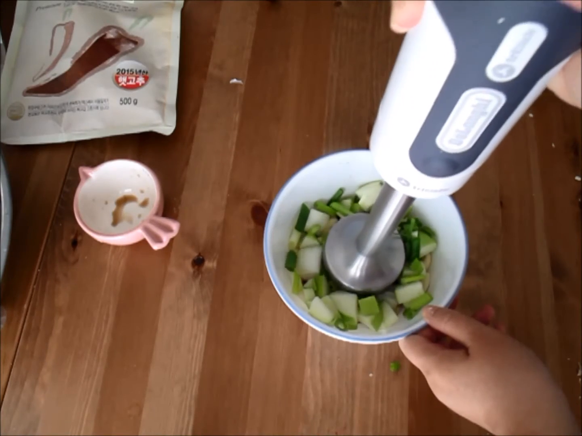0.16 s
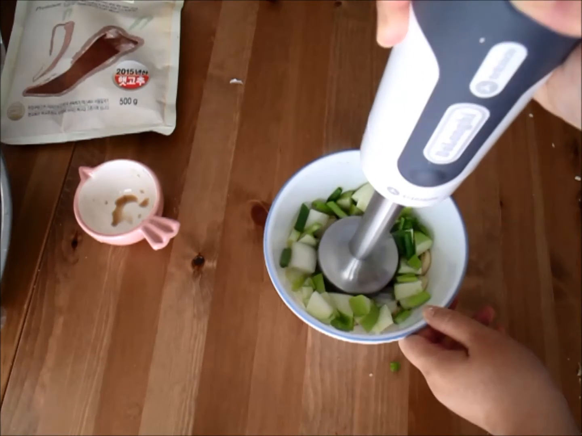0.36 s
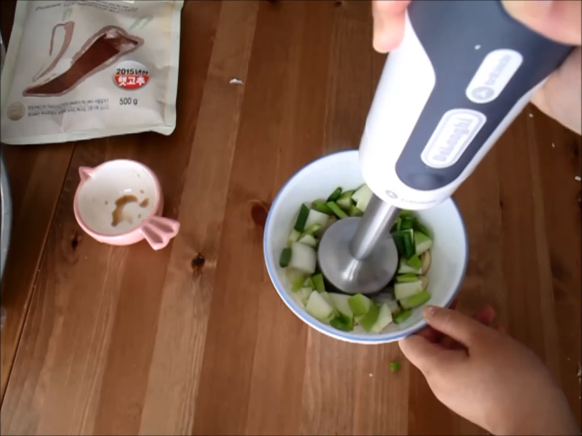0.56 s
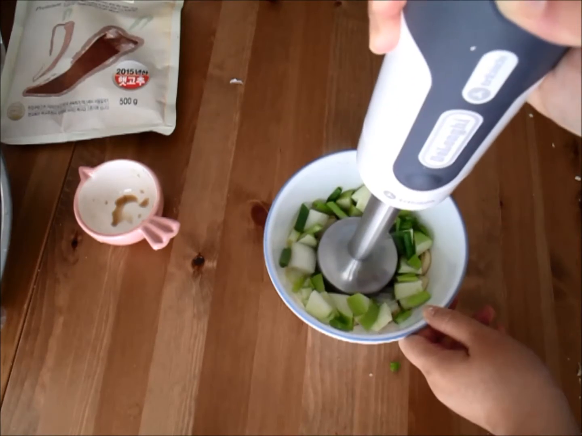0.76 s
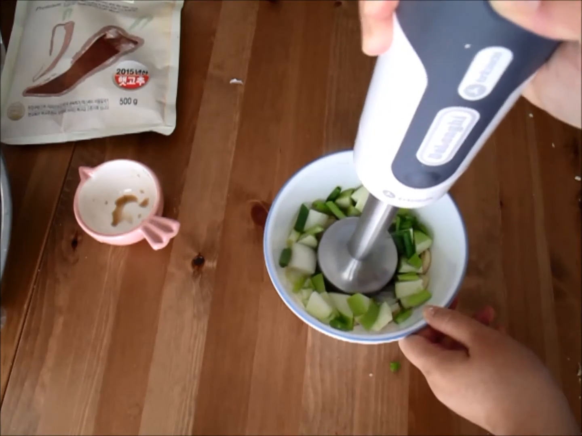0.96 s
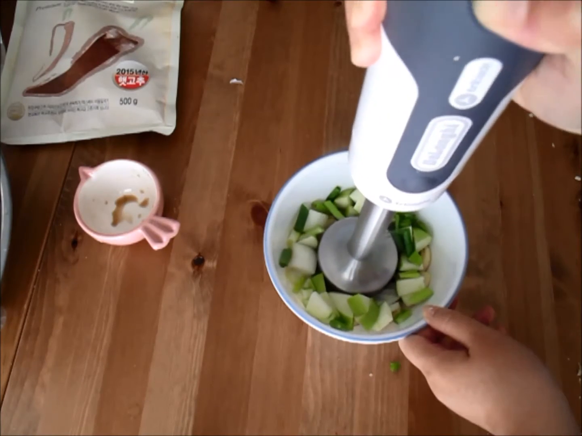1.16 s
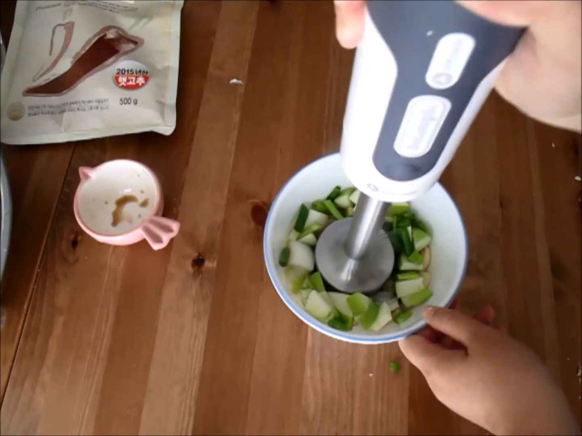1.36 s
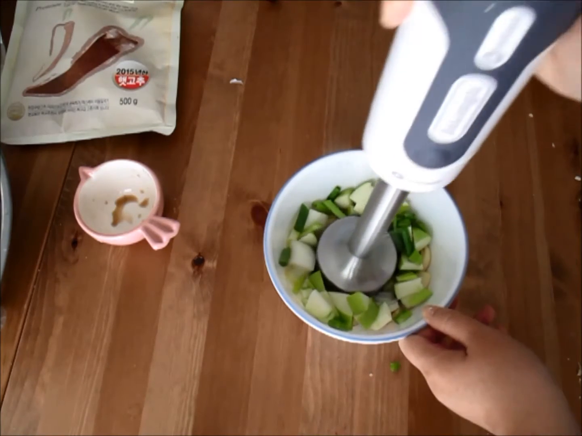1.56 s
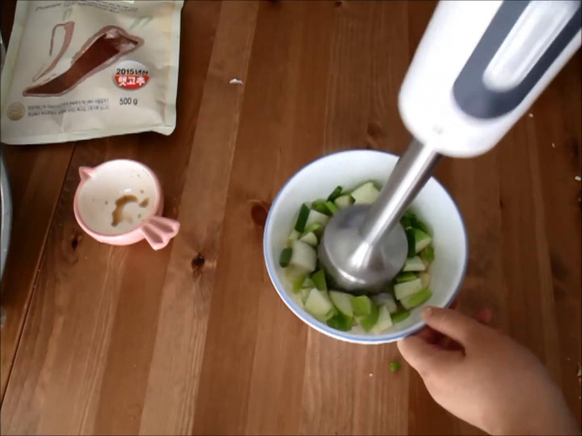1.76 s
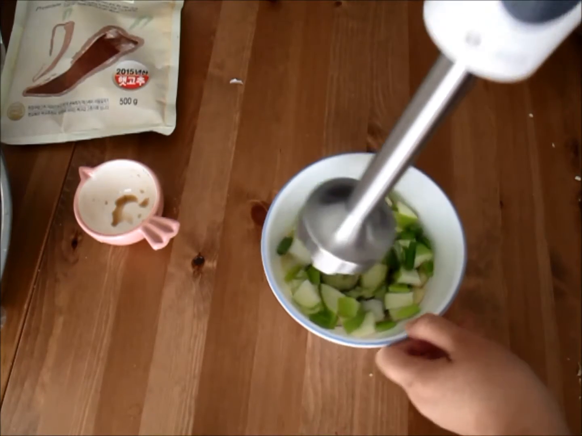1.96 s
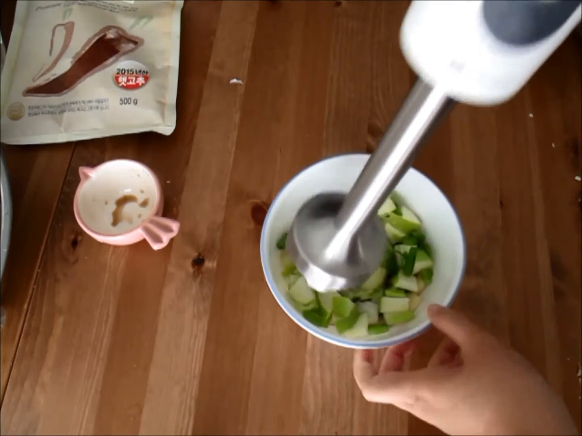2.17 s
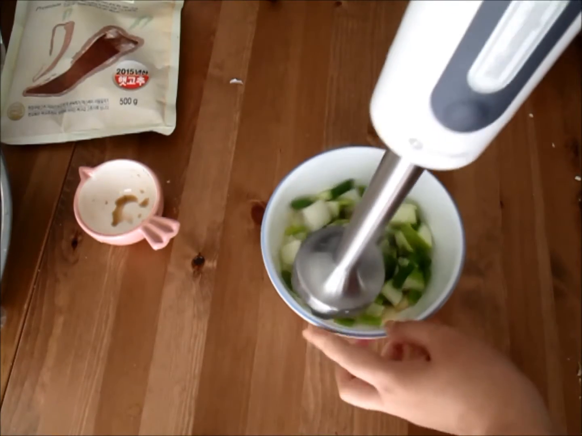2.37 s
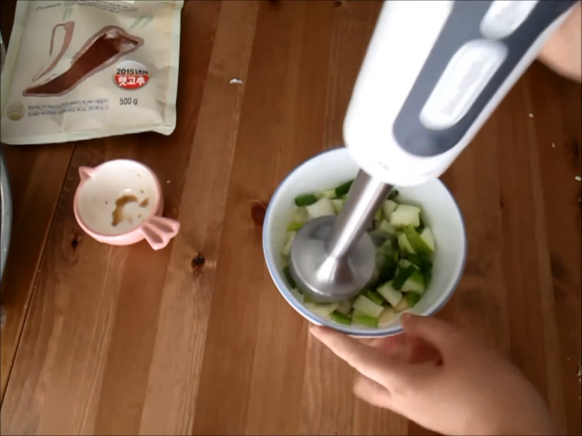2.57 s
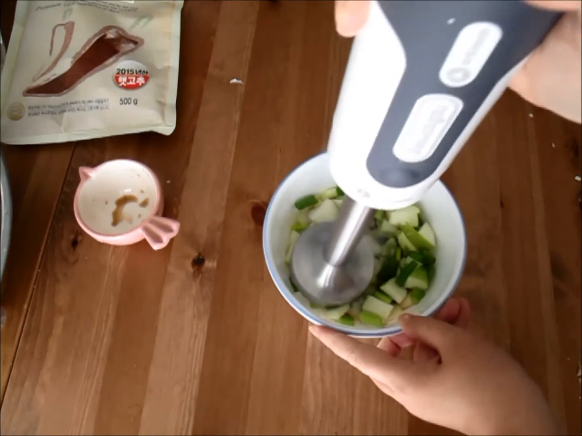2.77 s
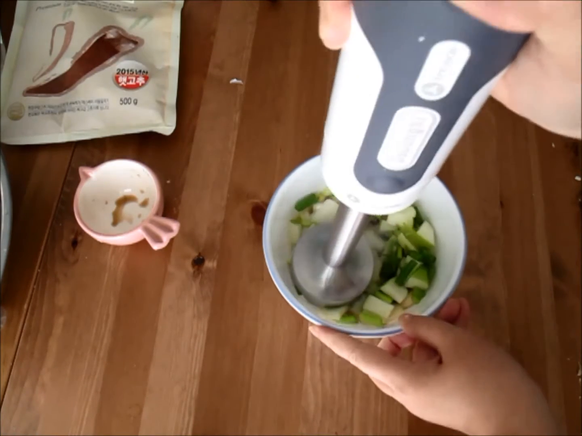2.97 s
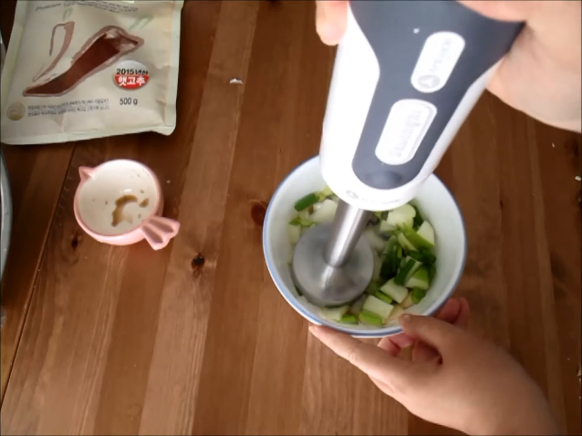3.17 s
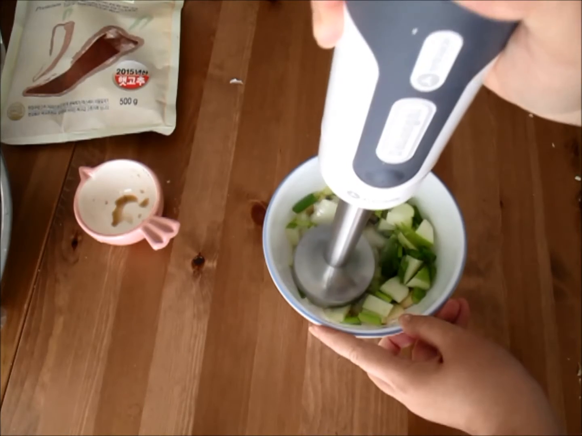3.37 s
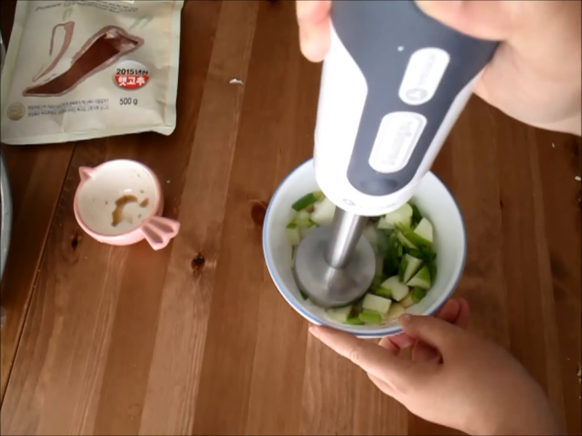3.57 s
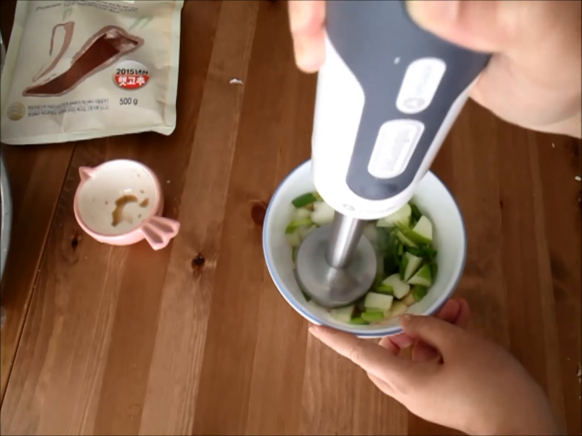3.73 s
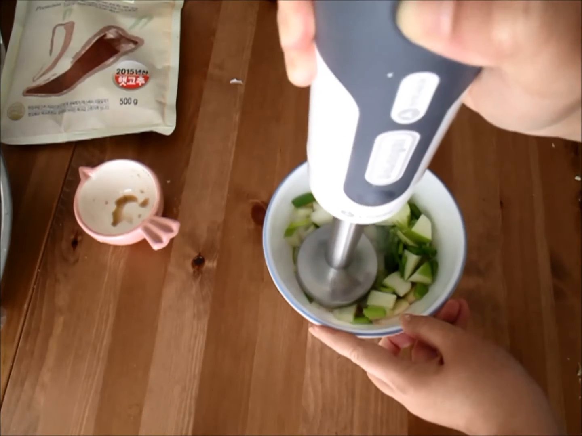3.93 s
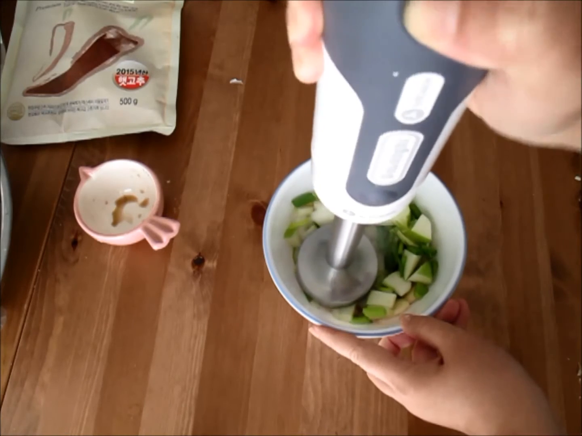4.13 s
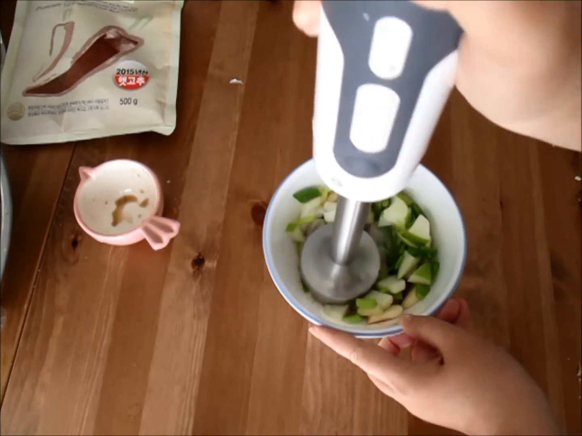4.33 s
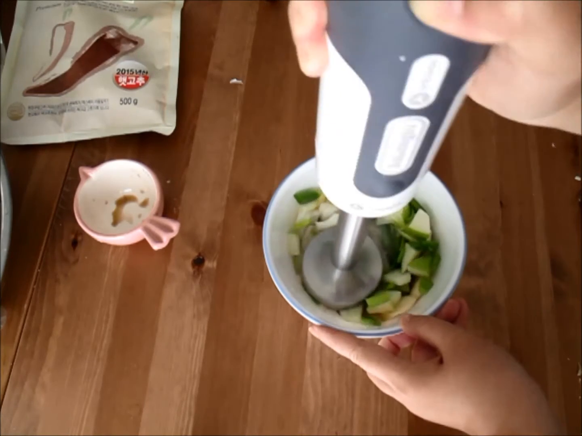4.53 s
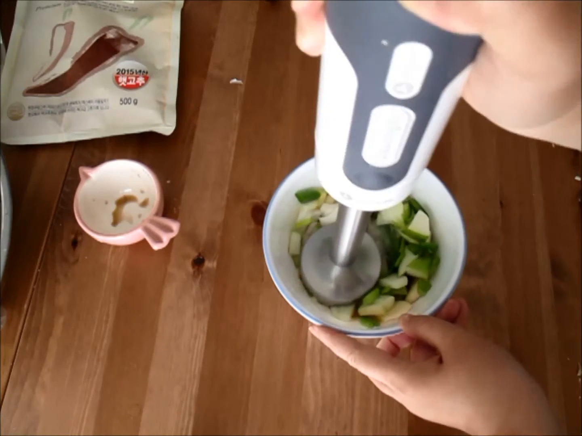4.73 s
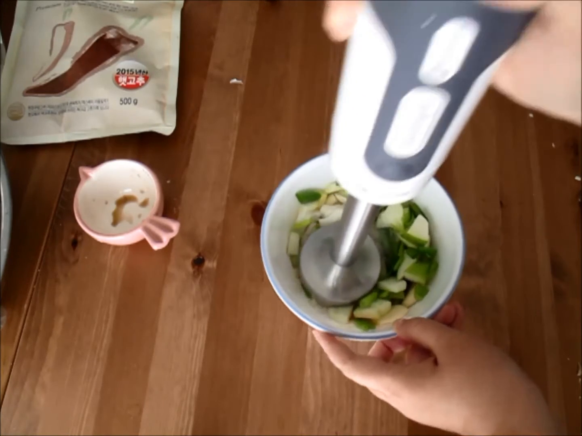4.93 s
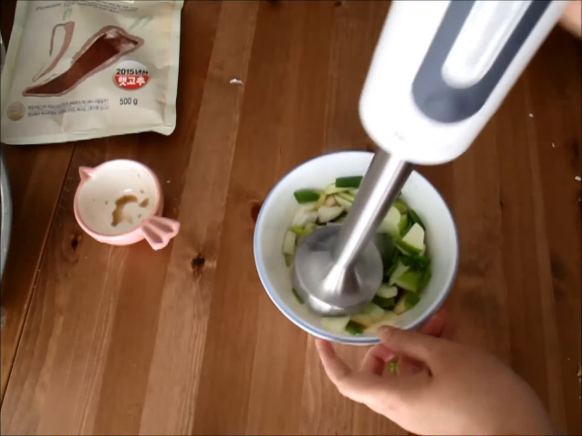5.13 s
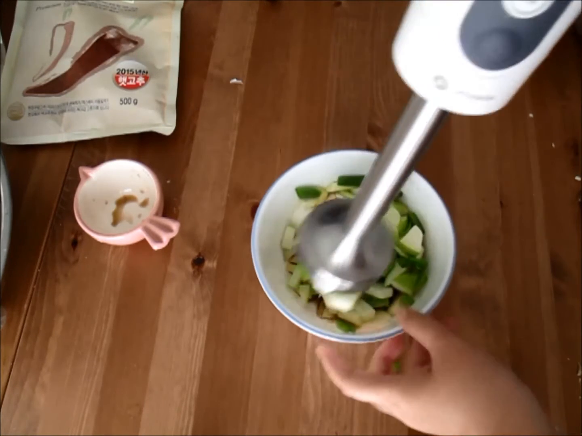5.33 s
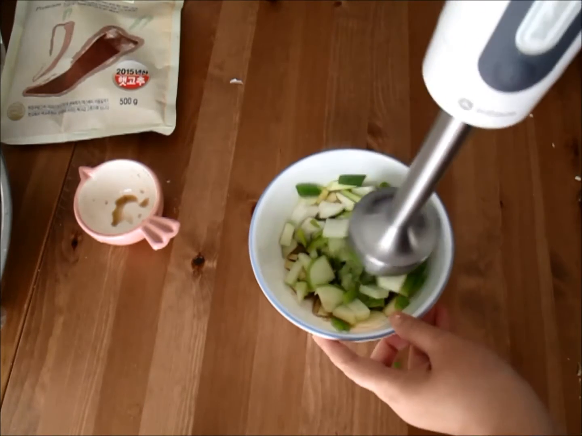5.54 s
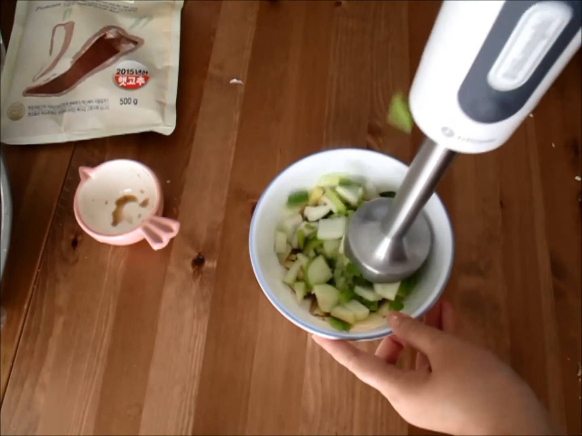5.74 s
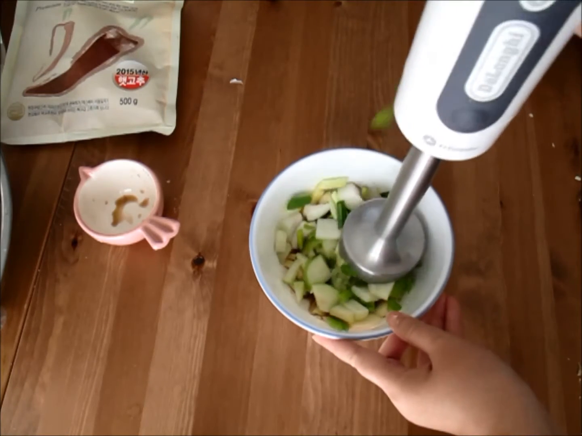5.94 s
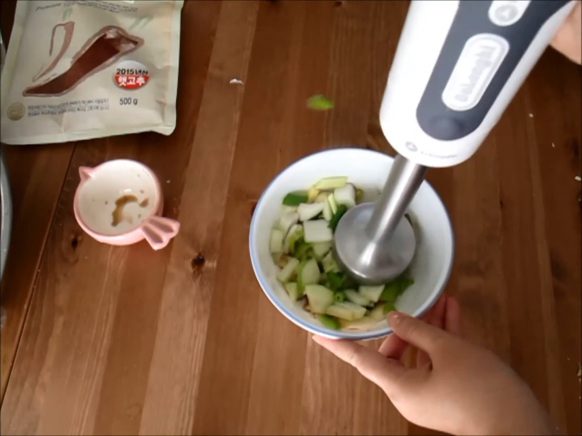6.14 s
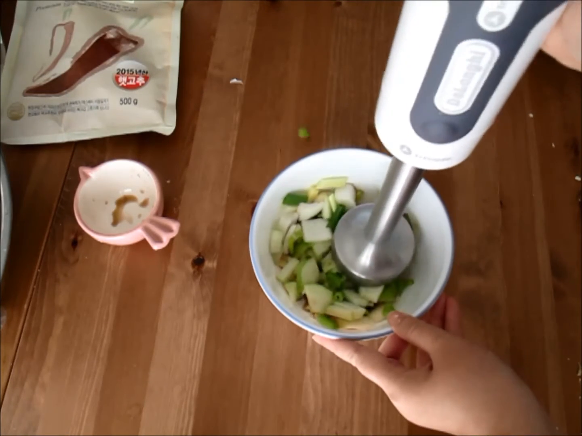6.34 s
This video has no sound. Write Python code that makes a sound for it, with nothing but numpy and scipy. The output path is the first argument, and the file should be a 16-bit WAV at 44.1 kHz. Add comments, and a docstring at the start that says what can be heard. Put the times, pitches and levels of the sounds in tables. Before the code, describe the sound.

Harsh whining blender motor chops wet vegetables in bursts, winding down each time, with sharp knocks ringing the ceramic bowl.

```python
"""A stick blender chops spring onion in a china bowl on a wooden table, in a small kitchen with faint steady tones.
It is already running: the shaft rattles each turn, the blade hums in its steel bell, the commutator whines.
Let go, it coasts down with hard ticks; its bell knocks on the bowl, which rings, and the button is pressed again.
A second burst and ticking coast follow, then more knocks and a third burst, still running at the end.
Shaft angle drives the motor's tones and contacts; filtered noise makes hiss and thuds; resonators ring the steel and china."""
import sys
import numpy as np
from scipy import signal
from scipy.fft import rfft, irfft
from scipy.io import wavfile
from scipy.ndimage import uniform_filter1d

SR = 44100
rng = np.random.default_rng(int(sys.argv[2]) if len(sys.argv) > 2 else 0)


def int16_out(signal):
    """Quantize to a 16-bit WAV file."""
    q = np.round(np.clip(np.atleast_2d(signal).T, -1, 1) * 32767)
    wavfile.write(sys.argv[1], SR, q.astype(np.int16))


N = 282240
TIME = np.arange(N) / SR  # s


def from_db(db):
    """Decibels to gain."""
    return 10 ** (np.asarray(db) / 20)


def rms_one(x):
    """Scale to unit rms."""
    return x / np.sqrt(np.mean(x ** 2) + 1e-20)


def evened(x):
    """Level out the running rms to about one, leaving near-silence low."""
    running_power = np.abs(uniform_filter1d(x ** 2, size=2400))
    return x / np.sqrt(running_power + 1e-4 * np.mean(x ** 2))


def in_time(rows):
    """One curve over time for each column of a table."""
    s, *columns = np.transpose(sorted(map(tuple, rows)))
    return [np.interp(TIME, s, c) for c in columns]


def coloured(x, spectrum):
    """Causal (minimum-phase) filter with the given spectrum, built through the cepstrum."""
    size = 4096
    hz, db = np.transpose(spectrum)
    bin_hz = np.arange(size // 2 + 1) * SR / size
    bin_db = np.interp(np.log(bin_hz + 1), np.log(hz), db)
    cepstrum = irfft(np.log(from_db(bin_db)))[:size // 2]
    cepstrum[1:] *= 2
    response = irfft(np.exp(rfft(cepstrum, size)))
    return signal.oaconvolve(x, response)[:N]


def noise(spectrum):
    """Coloured noise, rms 1."""
    return rms_one(coloured(rng.standard_normal(N), spectrum))


def drift(rate):
    """Random wander, rms 1, with the given number of new values per second."""
    steps = rng.standard_normal(4000)
    return rms_one(np.interp(TIME * rate, np.arange(len(steps)), steps))


def dying_noise(t60):
    """The response of countless close modes, nearly even in frequency, with unit energy."""
    t = TIME[:SR // 2]
    modes = rfft(rng.standard_normal(len(t)) * from_db(-60 * t / t60))
    flat = irfft(modes / (np.abs(modes) + 1e-12), len(t))
    response = flat * from_db(-15 * t / t60)
    return response / np.linalg.norm(response)


def resonance(hz, centre_hz, width_hz):
    """Gain of a resonance, 1 on top."""
    return 1 / np.sqrt(1 + (2 * (hz - centre_hz) / width_hz) ** 2)


def moving_ring(x, centre_hz, width_hz, size=256):
    """A two-pole resonator whose centre and width may glide, updated once a block."""
    radius = np.exp(-np.pi * width_hz / SR) * np.ones(N)
    out, state = np.zeros(N), np.zeros(2)
    for i in range(0, N, size):
        r = radius[i]
        zeros = np.array([1, 0, -1]) * (1 - r * r) / 2
        poles = [1, -2 * r * np.cos(2 * np.pi * centre_hz[i] / SR), r * r]
        out[i:i + size], state = signal.lfilter(zeros, poles, x[i:i + size], zi=state)
    return out


def fixed_ring(x, centre_hz, width_hz):
    """A resonator that keeps its pitch."""
    return moving_ring(x, np.full(N, centre_hz), width_hz, size=N)


def ramp(at, length_s):
    """Rise from 0 to 1, centred on a moment."""
    return np.clip((TIME - at) / length_s + .5, 0, 1)


def spell(start, end):
    """Swell, hold and fade, each edge centred on its moment."""
    edge_s = .04
    return ramp(start, edge_s) * (1 - ramp(end, edge_s))


def spells(rows):
    """Summed gain over time for a table of (start, end, level)."""
    return sum(from_db(db) * spell(start, end) for start, end, db in rows)


# Room noise spectrum: (frequency [Hz], relative density [dB])
ROOM_SPECTRUM = [(15, -24), (25, -13), (90, -13), (134, -8), (206, -8), (301, -8), (439, -2), (545, -12),
                 (641, -3.5), (1190, -12.5), (4140, -21), (5570, -21), (6050, -14), (6560, -30),
                 (9570, -15.5), (16000, -53)]
# Faint steady tones: (frequency [Hz], rms level [dB])
STEADY_TONES = [(296.1, -68), (538.3, -60.5), (5879, -61)]


def background():
    """Room noise is shaped noise; the faint steady tones are plain sines."""
    room = from_db(-51.5) * noise(ROOM_SPECTRUM)
    tones = sum(np.sqrt(2) * from_db(db) * np.sin(2 * np.pi * hz * TIME) for hz, db in STEADY_TONES)
    return room + tones


def kitchen(x, t60, wet_db):
    """The near walls return a short diffuse tail, 6 ms late."""
    tail = np.concatenate([np.zeros(int(.006 * SR)), dying_noise(t60)])
    return x + from_db(wet_db) * signal.oaconvolve(x, tail)[:N]


# The bell strikes and the blade bites:
# (time [s], crack level [dB], table thud level [dB], bowl ring drive [dB])
KNOCKS = [(2.378, -22.5, -27.5, -41), (2.431, -37, -38, -51), (2.609, -30, -41.5, -56),
          (2.664, -39, -49, -66), (2.697, -42, -52, -70), (2.769, -38, -66, -78), (2.835, -23, -55, -70),
          (2.841, -9.5, -34, -43), (2.861, -11, -48, -55), (3.308, -11, -52, -53),
          (5.5945, -14.5, -18.5, -41), (5.621, -27, -32, -49), (5.648, -24, -31, -63),
          (5.671, -21, -30, -62), (5.676, -15, -25.5, -44.5), (5.686, -14.5, -23, -64),
          (5.987, -7.5, -33.5, -58.5), (6.000, -5, -50, -51), (6.112, -14, -56, -65)]


def blows(column, t60, rise_s):
    """Each knock rises fast and dies exponentially, at the level in one column of its table."""
    out = np.zeros(N)
    for s, *levels_db in KNOCKS:
        at = int(s * SR)
        t = TIME[:min(N - at, SR // 2)]
        out[at:at + len(t)] += from_db(levels_db[column] - 60 * t / t60) * (1 - np.exp(-t / rise_s))
    return out


# Knock spectra, crack and table thud: (frequency [Hz], relative density [dB])
CRACK_SPECTRUM = [(200, -23), (700, -34), (1300, 4), (2500, -0.5), (5000, -8), (8500, -0.5), (16000, -11)]
THUD_SPECTRUM = [(40, -25), (120, 6.5), (200, -3.5), (390, 8.5), (560, -4.5), (850, 2.5), (1400, -10),
                 (3000, -14.5)]
# The bell shuffles among the wet pieces: (start [s], end [s], level before its flutter [dB])
SHUFFLE = [(2.28, 2.58, -57), (2.59, 2.71, -48)]
# A low rumble while the hand shifts the bowl: (start [s], end [s], level [dB])
SHIFTING = [(2.3, 2.95, -61.5)]
# Spectrum of that rumble: (frequency [Hz], relative density [dB])
SHIFT_SPECTRUM = [(20, -16), (58, 5), (95, -14), (300, -45)]


def bowl():
    """Noise bursts crack and thump the table; wet pieces shuffle as fluttering noise; the bowl rumbles."""
    shuffle = spells(SHUFFLE) * from_db(3.8 * drift(190))
    crack = (blows(0, t60=0.028, rise_s=0.00052) + shuffle) * noise(CRACK_SPECTRUM)
    thud = blows(1, t60=0.087, rise_s=0.00037) * noise(THUD_SPECTRUM)
    return crack + thud + spells(SHIFTING) * noise(SHIFT_SPECTRUM)


# Ringing modes of the bowl: (frequency [Hz], level re the knock's ring drive [dB], decay by 60 dB [s])
BOWL_MODES = [(382, -3, .3), (1384, 8, .27), (2568, 3, .5), (3601, -8, .2), (4037, -5, .3), (5803, 4, .2),
              (7817, -2, .27)]


def china():
    """The knocks set the bowl's modes ringing, each a decaying sine."""
    s, _, _, ring_db = np.transpose(KNOCKS)
    out = np.zeros(N)
    for hz, db, t60 in BOWL_MODES:
        clicks = np.full(N, 1e-18)
        clicks[(s * SR).astype(int)] = from_db(ring_db + db + rng.normal(0, 1, len(s)))
        r, w = from_db(-60 / (t60 * SR)), 2 * np.pi * hz / SR
        out += signal.lfilter([0, np.sin(w)], [1, -2 * r * np.cos(w), r * r], clicks)
    return out


# The button is pressed and let go: (press [s], release [s], the rattling shaft settles [s],
# dry friction [turns per s per s], speed lost to the pieces [turns per s])
BURSTS = [(-1, 1.42, 1.705, 143, 72), (2.838, 4.8, 5.095, 186, 46), (5.984, 7, 7.3, 188, 45)]


def by_burst(tables):
    """Each burst's curves take over when the button is pressed."""
    curves = in_time(tables[0])
    for (press, *_), rows in zip(BURSTS, tables):
        curves = np.where(TIME >= press, in_time(rows), curves)
    return curves


# Powered shaft speed before spin-up and braking, one curve a burst: (time [s], speed [turns per s])
POWERED_SPEED = [
    [(0.0, 222.1), (0.292, 210.8), (0.418, 223.4), (0.502, 218.9), (1.012, 218.4), (1.114, 211.1),
     (1.166, 210.4), (1.23, 201.4), (1.284, 189.2), (1.388, 196.0), (1.42, 202.5)],
    [(2.98, 231.8), (3.076, 235.0), (3.284, 228.8), (3.324, 223.2), (3.516, 219.2), (3.598, 220.8),
     (3.886, 212.8), (4.014, 215.2), (4.16, 212.2), (4.338, 202.6), (4.494, 212.5), (4.642, 214.4),
     (4.8, 228.2)],
    [(6.15, 230.9), (6.254, 232.3), (6.4, 227.6)],
]
SPIN_UP_S, DRAG_S, SETTLE_S = .032, .115, 0.052  # start and braking time constants, settling time


def drive():
    """The shaft spins up, runs, then coasts against pieces and dry friction; gives speed and settling 0-1."""
    powered, = by_burst(POWERED_SPEED)
    speed, settled = np.zeros(N), np.zeros(N)
    for press, release, settle, friction, drag in BURSTS:
        running = np.maximum(TIME - press, 0)
        coasting = np.maximum(TIME - release, 0)
        lost = friction * coasting + drag * (1 - np.exp(-coasting / DRAG_S))
        spun_up = powered * (1 - np.exp(-running / SPIN_UP_S))
        speed = np.where(TIME >= press, spun_up - lost, speed)
        settled = np.where(TIME >= press, ramp(settle, SETTLE_S), settled)
    return np.maximum(speed, 0), settled


# Each layer: (gain while running [dB], level once the shaft has settled [dB],
# power of the speed by which it dies away [-])
LAYERS = {"hum": (0.3, -50, 1.0), "drone": (0.68, -49.5, 1.0), "bell": (0.7, -41.5, 0.77),
          "rattle": (-0.92, -37, 1.16), "brush": (0.87, -29.5, 1.25)}
FADE_BELOW_TURNS_PER_S = 67.4


def loudness(layer, running_db, speed, settled):
    """A layer drops when the shaft settles, then dies away with the speed."""
    gain_db, coasting_db, power = LAYERS[layer]
    fade = np.clip(speed / FADE_BELOW_TURNS_PER_S, 1e-6, 1) ** power
    running = (1 - settled) * from_db(running_db + gain_db)
    return running + settled * from_db(coasting_db) * fade


# A slower shaft runs rougher: (speed [turns per s], roughness before chewing [0-1])
SPEED_ROUGHNESS = [(70, 0.94), (135, 0.65), (200, 0.58), (220, .445), (235, 0.37)]
# The blade chews through pieces, or runs smoothly in a hollow:
# (start [s], end [s], added roughness [0-1], added rattle level [dB])
CHEWING = [(0, .33, 0.19, -1), (0.34, 1.04, -.05, -1.5), (1.06, 1.57, 0.11, 0), (1.57, 1.85, -.08, 0),
           (2.827, 2.916, .3, -0.5), (3.17, 3.22, 0.14, 2.5), (3.294, 3.337, .45, 4.5),
           (3.358, 3.85, 0.05, 0), (3.85, 4.3, 0.12, 0.5), (4.304, 4.423, 0.03, -0.5),
           (4.503, 4.61, 0.1, 1), (4.66, 4.8, 0.08, 1.5), (4.8, 5.0, -.07, 0.5), (5.0, 5.1, -.04, 0),
           (5.977, 6.117, 0.2, 1), (6.12, 6.372, 0.08, -0.5), (6.365, 6.45, 0.37, 1.5)]


def roughness(speed):
    """Roughness grows as the shaft slows and while the blade chews."""
    chewing = sum(added * spell(start, end) for start, end, added, _ in CHEWING)
    return np.clip(np.interp(speed, *np.transpose(SPEED_ROUGHNESS)) + chewing, .05, 1)


# Once-a-turn tone of the unbalanced blade, one curve a burst: (time [s], rms level at speed [dB])
UNBALANCE = [
    [(0.0, -49), (0.188, -55), (0.444, -45), (1.052, -59), (1.29, -42.5), (1.528, -48), (1.55, -48)],
    [(2.92, -49), (3.58, -52), (3.68, -70), (3.82, -50), (3.97, -46), (4.45, -46), (4.59, -50), (4.95, -47)],
    [(6.04, -60), (6.164, -49), (6.4, -61)],
]


def unbalance(angle, speed):
    """The unbalanced blade sounds a sine once a turn, absent when slow."""
    db, = by_burst(UNBALANCE)
    fast = np.clip((speed - 80) / 60, 0, 1)
    return np.sqrt(2) * from_db(db) * fast * np.sin(angle)


# Buzz of the motor's iron: (start [s], end [s], peak level [dB])
MAINS_BUZZ = [(3.55, 4.1, -55.5)]


def mains_buzz():
    """The motor's iron buzzes at twice the 60 Hz mains rate."""
    return spells(MAINS_BUZZ) * np.sin(2 * np.pi * 2 * 60 * TIME)


def blade(turns, speed, rough, low_hz, high_hz, centre_hz, width_hz, count):
    """The blade's harmonics, from the second, that fall within one resonance of the steel bell."""
    tone = 0
    for order in np.arange(2, count + 1):
        hz = order * speed
        passed = 1 / np.sqrt((1 + (low_hz / hz) ** 32) * (1 + (hz / high_hz) ** 32))
        gain = passed * resonance(hz, centre_hz, width_hz) * from_db(4.0 * drift(11))
        blur = 0.63 * rough * drift(70)
        tone = tone + gain * np.sin(2 * np.pi * (order * turns + rng.random()) + blur)
    cutting = np.clip((speed - 80) / 70, 0, 1)  # a slow blade only stirs
    return cutting * evened(tone)


# Blade's low harmonics, one curve a burst:
# (time [s], hum level before layer gain [dB], drone level before layer gain [dB])
BLADE_LEVELS = [
    [(0.0, -57, -48), (0.268, -45, -58), (0.356, -44, -35), (0.414, -53.5, -33.5), (0.762, -38.5, -30.5),
     (1.054, -42, -32.5), (1.092, -46, -39), (1.364, -34, -36), (1.444, -47, -50), (1.548, -35.5, -41),
     (1.69, -53, -48)],
    [(2.85, -44, -50), (2.9, -56, -44), (3.08, -42, -41), (3.17, -52, -26), (3.28, -39, -39),
     (3.4, -56, -36), (3.6, -39, -32.5), (4.0, -46, -39.5), (4.18, -40, -35.5), (4.23, -57, -36),
     (4.35, -40.5, -46), (4.68, -38, -34), (4.75, -32, -52), (4.86, -31.5, -36), (5.07, -52, -57)],
    [(6.02, -56, -52), (6.128, -48, -60), (6.196, -46, -54), (6.4, -53, -59)],
]
# Steel bell as the filling shifts, one curve a burst:
# (time [s], level before layer gain [dB], resonance [Hz])
BELL = [
    [(0.0, -33.5, 1110), (0.112, -38.5, 1300), (0.188, -31, 1320), (0.54, -29.5, 980), (0.676, -27.5, 990),
     (0.87, -29.5, 950), (1.152, -28.5, 1060), (1.204, -30, 1260), (1.426, -29.5, 1140), (1.69, -33, 1430)],
    [(2.85, -28.5, 1410), (2.92, -28.5, 910), (3.12, -27, 920), (3.28, -24, 1040), (3.45, -23.5, 960),
     (3.62, -23.5, 910), (3.73, -23, 855), (3.85, -29, 948), (3.99, -24, 862), (4.18, -26, 870),
     (4.24, -27.5, 1380), (4.48, -37.5, 1330), (4.6, -36, 970), (4.69, -32, 1440), (4.97, -35, 1460),
     (5.03, -27.5, 1540), (5.07, -32, 1510)],
    [(6.0, -31.5, 1260), (6.1, -29.5, 1150), (6.14, -27.5, 1170), (6.19, -20.5, 1210), (6.28, -30.5, 1210),
     (6.34, -36.5, 1200), (6.4, -29, 990)],
]
# Churning pieces under hum, drone and bell: (frequency [Hz], relative density [dB])
RUMBLE_SPECTRUM = [(60, -31), (130, 2), (250, -16), (400, 11), (520, -9), (800, -7.5)]
SLOSH_SPECTRUM = [(420, -18.5), (550, -2.5), (750, 2), (950, -14)]
CHURN_SPECTRUM = [(550, -25.5), (760, 0.5), (1100, 3), (1500, 8), (1900, -18.5)]


def blade_in_bell(turns, speed, rough, motion):
    """Blade and churning pieces sound through the bell, whose pitch moves with the filling."""
    hum_db, drone_db = by_burst(BLADE_LEVELS)
    bell_db, bell_hz = by_burst(BELL)
    churn = rough ** 2 * from_db(3.16 * drift(90))
    hum = blade(turns, speed, rough, 280, 520, 570, 270, count=4)
    hum = evened(hum + 0.86 * churn * noise(RUMBLE_SPECTRUM))
    drone = blade(turns, speed, rough, 560, 750, 810, 200, count=6)
    drone = evened(drone + churn * noise(SLOSH_SPECTRUM))
    bell = blade(turns, speed, rough, 730, 1600, bell_hz, width_hz=277, count=11)
    bell = evened(bell + 1.22 * churn * noise(CHURN_SPECTRUM))
    low = loudness("hum", hum_db, *motion) * hum + loudness("drone", drone_db, *motion) * drone
    return low + loudness("bell", bell_db, *motion) * bell


# As the load on the bearing shifts, one overtone of the shaft rings out; rows at twelve a turn are the
# commutator's tone ringing the frame: # (start [s], end [s], multiple of the speed [-], rms level before
# wavering [dB])
BEARING = [(0, 0.336, 4, -44.5), (0.103, .3, 6, -32), (0, .33, 12, -35), (.33, 0.497, 8, -32),
           (.33, .5, 9, -32.5), (0.35, 0.505, 13, -27.5), (0.345, 0.484, 20, -29.5), (.52, 1.04, 6, -36),
           (.52, 1.04, 9, -35), (.52, 1.02, 12, -28), (.52, 1.04, 13, -34), (.52, .72, 15, -36),
           (.62, 1.03, 16, -32), (.52, 1.032, 18, -31.5), (.55, 1.03, 20, -37), (.52, 1.04, 23, -39),
           (.52, 1.04, 29, -40), (3.0, 3.13, 6, -32), (2.97, 3.23, 9, -36), (3.033, 3.17, 19, -34),
           (3.582, 3.76, 10, -31.5), (3.98, 4.145, 4, -32.5), (4.78, 4.88, 10, -32), (4.82, 4.885, 7, -33),
           (4.91, 4.97, 24, -38), (4.92, 5.0, 12, -28), (4.94, 5.08, 10, -33), (4.97, 5.05, 6, -32),
           (5.02, 5.1, 11, -33), (5.02, 5.085, 17, -31), (6.03, 6.38, 6, -27)]


def ringing_overtones(angle):
    """Single overtones of the shaft swell, waver and fade."""
    out = 0
    for start, end, order, db in BEARING:
        level = np.sqrt(2) * from_db(db + 1.1 * drift(19)) * spell(start, end)
        out = out + level * np.sin(round(order) * angle + 0.37 * drift(40))
    return out


BARS = 12  # commutator cycles a turn
# Narrow resonance of the motor frame; levels re rattle, the frame's before any added ringing
FRAME_HZ, FRAME_WIDTH_HZ, FRAME_DB, COMMUTATOR_DB = 2700, 120, -17, -31
# Pressed down, the frame rings more freely: (start [s], end [s], added level re rattle [dB])
FRAME_RINGS = [(.38, 1.05, -18), (3.35, 3.85, -11)]
# Rough running breaks up the tone: (roughness [0-1], commutator gain [dB])
BREAKS_UP = [(.43, 1.5), (.56, -8)]


def commutator_strength(speed, rough):
    """The commutator's tone, re rattle, swells as it crosses the motor frame's resonance."""
    frame = from_db(FRAME_DB) + spells(FRAME_RINGS)
    swell = frame * resonance(BARS * speed, FRAME_HZ, FRAME_WIDTH_HZ) ** 2
    steadiness_db = np.interp(rough, *np.transpose(BREAKS_UP)) + 1.2 * drift(25.7)
    return (from_db(COMMUTATOR_DB) + swell) * from_db(steadiness_db)


# The loose coupling knocks harder: (start [s], end [s], added level re rattle [dB])
KNOCKING = [(0, .2, 2.5), (1.33, 1.42, -5.5), (1.59, 1.7, -2), (1.72, 2.04, -5.5), (4.22, 4.42, 0.5),
            (4.5, 4.62, 1.5), (4.73, 4.8, -3), (4.93, 5.0, -1), (5.0, 5.09, -5), (5.31, 5.43, -5),
            (5.43, 5.58, -9), (6.32, 6.37, 5)]


def coupling_knock_db(speed):
    """Level of the coupling's knock, re rattle; a slow shaft no longer throws it about."""
    thrown = np.clip(speed / 38, 0, 1) ** 4  # full above 38 turns per s
    base_db = -5.5
    return 20 * np.log10(thrown * (from_db(base_db) + spells(KNOCKING)))


def contacts(turns, angle, jitter_s, spread_db):
    """One click a turn at a given shaft angle, a little uneven in time and strength."""
    chance = rng.standard_normal((2000, 2))
    s = np.interp(np.arange(int(turns[-1]) - 1) + angle, turns, TIME)
    at = np.clip((s + jitter_s * chance[:len(s), 0]) * SR, 0, N - 2)
    strength = from_db(spread_db * chance[:len(s), 1])
    whole = at.astype(int)
    # share each click between the two nearest samples
    early = np.bincount(whole, strength * (1 - at + whole), N)
    late = np.bincount(whole + 1, strength * (at - whole), N)
    return early + late


def shaft(turns, knock_db, rough, spectrum, ring_t60, jitter_s, swing_db, tail):
    """Bearing contacts ring the housing, friction hisses in step, the loose coupling knocks each turn."""
    buzz = 0
    for angle in np.arange(3) / 3:
        # the point of contact creeps round the bearing
        clicks = contacts(turns + .012 * drift(5), angle, jitter_s, spread_db=0.5)
        clicks = clicks * from_db(3.0 * drift(5.35))
        buzz = buzz + signal.oaconvolve(clicks, dying_noise(ring_t60))[:N]
    hiss_db = swing_db * np.cos(2 * np.pi * (turns - .15))
    friction = rng.standard_normal(N) * from_db(hiss_db)
    rough = np.clip(rough, .05, .98)
    rattle = np.sqrt(1 - rough ** 2) * evened(coloured(buzz, spectrum))
    rattle = rattle + rough * evened(coloured(friction, spectrum))
    # a slow shaft falls back against the other side too
    slow = np.clip((135 - np.gradient(turns) * SR) / 60, 0, 1)
    rebound = 0.4 * slow * contacts(turns, .5, jitter_s, spread_db=1.3)
    clicks = contacts(turns, 0, jitter_s, spread_db=1.3) + rebound
    knock = signal.oaconvolve(clicks, dying_noise(0.0029) + tail * dying_noise(0.011))[:N]
    return evened(rattle + from_db(knock_db) * evened(coloured(knock, spectrum)))


# Resonances of the steel tube: (frequency [Hz], width [Hz], relative gain [dB])
TUBE = [(1620, 320, 6.5), (2100, 350, -1.5), (2550, 300, -7), (3800, 600, 0)]


def tube(x):
    """The steel tube round the shaft rings at its own fixed pitches."""
    return sum(from_db(db) * fixed_ring(x, hz, width_hz) for hz, width_hz, db in TUBE)


# Rattle spectrum before the housing colours it: (frequency [Hz], relative density [dB])
RATTLE_SPECTRUM = [(1100, -31), (1500, -2.5), (2000, 1), (2700, -1), (3200, -4), (3600, -2.5), (4050, -5),
                   (5000, -8), (6000, -29.5)]
# Pressed sideways, the tube buzzes at its upper resonance: (start [s], end [s], drive re rattle [dB])
TUBE_BUZZ = [(.5, 1.25, -8), (1.25, 1.44, -1), (1.5, 1.82, -3), (3.15, 3.3, -4), (3.85, 4.2, -9),
             (4.2, 4.44, -2), (4.5, 4.63, 0), (4.63, 5.1, -1), (6.13, 6.32, 3)]
# Lifted clear of the pieces, the blade's upper harmonics ring out:
# (start [s], end [s], added level re rattle before roughness dulls it [dB])
BLADE_CLEAR = [(4.68, 5.09, -11)]


def rattling_housing(turns, speed, rough, knock_db, housing_hz, housing_width_hz):
    """Shaft contacts ring housing and tube, while the blade's upper harmonics glide through."""
    rattle = shaft(turns, knock_db, rough, RATTLE_SPECTRUM,
                   ring_t60=0.022, jitter_s=8e-6, swing_db=4.0, tail=0.43)
    fast = np.clip((speed - 90) / 100, 0, 1)  # a fast shaft shakes the housing, a slow one taps the tube
    housing = 2.9 * fast * moving_ring(rattle, housing_hz, housing_width_hz)
    rattle = evened(rattle + housing + (1 - 1.12 * fast) * tube(rattle))
    tube_hz, tube_width_hz, _ = TUBE[-1]
    rattle = evened(rattle + spells(TUBE_BUZZ) * fixed_ring(rattle, tube_hz, tube_width_hz))
    overtones = blade(turns, speed, rough, 1750, 2270, 1900, 1100, count=14)
    clear = from_db(-11) + spells(BLADE_CLEAR)
    return evened(rattle + clear * (1 - rough) * overtones)


# The coasting shaft scrapes the tube and sets it ringing: (start [s], end [s], level before flutter [dB])
SCRAPING = [(1.75, 2.04, -45), (5.26, 5.42, -38.5), (5.42, 5.58, -42.5)]


def scraping(rattle):
    """The shaft's rattle, ringing through the tube, in spells of the coast."""
    return spells(SCRAPING) * evened(tube(rattle))


CUTOFF_HZ = 16050
# Overtones of the commutator: (multiple of its tone [-], relative level before wavering [dB])
WHINE = [(2, -13), (3, -18), (4, -2), (5, -13), (6, -3), (7, -9), (8, 0), (9, -6), (10, -1), (11, -5),
         (12, -2)]


def whine(angle, speed):
    """Commutator overtones, blurred by bouncing brushes and flanked by once- and twice-a-turn sidebands."""
    out = 0
    for multiple, db in WHINE:
        order = round(multiple) * BARS
        audible = np.clip((CUTOFF_HZ - order * speed) / 2000, 0, 1)
        level = audible * from_db(db + 1.5 * drift(40))
        out = out + level * np.sin(order * angle + .7 * drift(300))
    # a fast shaft whirls and presses the brushes unevenly
    wobble = .9 * np.clip((speed - 120) / 60, 0, 1)
    pressure = drift(30) * np.cos(angle) + drift(30) * np.cos(2 * angle)
    return evened(out * (1 + wobble * pressure))


# Brush and dry-guide spectrum: (frequency [Hz], relative density [dB])
BRUSH_SPECTRUM = [(450, -25), (1400, -18), (3900, -17), (4900, -4.5), (5700, -5.5), (6600, -2.5),
                  (8500, 1.8), (10500, -2.5), (16000, -3)]
# The shaft chatters in its guide:
# (start [s], end [s], drive re brush [dB], resonance [Hz], width [Hz])
CHATTER = [(0, 0.257, 11, 6000, 1400), (0, 0.257, 7, 4750, 600), (0.548, 1.15, -7, 5630, 1000),
           (.75, 1.28, -4, 5300, 500), (2.923, 3.198, -7, 5530, 600), (3.58, 3.8, -2, 5360, 500),
           (3.8, 4.2, -3, 5060, 800), (4.1, 4.62, -7, 8300, 1600), (4.233, 4.314, 12, 5350, 1200),
           (4.4, 4.48, -2, 5300, 700), (4.48, 4.647, 0, 6800, 700), (4.68, 4.817, -6, 8650, 1200),
           (4.925, 5.027, 3, 7450, 900), (6.01, 6.316, -2.5, 5300, 800)]
# The brushes sing louder: (start [s], end [s], added level re brush [dB])
SINGING = [(1.52, 1.58, -12), (2.97, 3.15, -13), (4.79, 4.95, -8), (4.95, 5.09, -7), (5.09, 5.22, -3),
           (5.22, 5.32, -7), (5.32, 5.42, -14), (6.08, 6.2, -9)]


def brushes(turns, angle, speed, rough, settled, knock_db):
    """Brushes and dry guide hiss with each turn, chatter at resonances and sing with the commutator."""
    brush = shaft(turns, knock_db + 1.5 - 6 * settled, rough + 0.066, BRUSH_SPECTRUM,
                  ring_t60=0.014, jitter_s=1.2e-5, swing_db=1.0, tail=0.76)
    chatter = 0
    for start, end, db, hz, width_hz in CHATTER:
        chatter = chatter + from_db(db) * spell(start, end) * fixed_ring(brush, hz, width_hz)
    singing = from_db(-15) + spells(SINGING)
    return evened(evened(brush + chatter) + singing * whine(angle, speed))


# The coupling catches with a single hard tick: (time [s], relative peak level [dB])
TICKS = [(1.407, -10), (1.4324, -8), (1.602, -6), (1.611, -7), (1.62, -8), (1.689, -11), (1.7724, -15),
         (1.949, -16), (1.988, -19), (2.0318, -22), (5.343, -15), (5.368, -12), (5.395, -14), (5.484, -16),
         (5.503, -16)]
# Tick spectrum: (frequency [Hz], relative density [dB])
TICK_SPECTRUM = [(250, -45), (900, -19), (1600, 2), (2200, -1), (2900, 0), (3900, 0), (5200, -10),
                 (8500, 0), (16000, -15)]


def ticks(turns):
    """Hard catches of the coupling: decaying noise, each in step with the nearest turn of the shaft."""
    s, peak_db = np.transpose(TICKS)
    caught = np.interp(np.round(np.interp(s, TIME, turns)), turns, TIME)
    envelope = 0
    for at, db in zip(caught, peak_db):
        decay_db = 60 * np.clip(TIME - at, 0, 1) / 0.021  # 60 dB in 21 ms
        envelope = envelope + from_db(db - 9 - decay_db) * (TIME >= at)
    return envelope * noise(TICK_SPECTRUM)


# The running shaft, one curve a burst: (time [s], rattle level before chewing and layer gain [dB],
# housing resonance [Hz], its width [Hz], brush level before layer gain [dB])
CLATTER = [
    [(0.0, -27, 2900, 1500, -21.5), (0.144, -24, 2950, 1500, -21.5), (0.3, -21.5, 2720, 1000, -24.5),
     (0.422, -19.5, 2780, 1500, -21), (0.592, -20.5, 2570, 1500, -25), (1.02, -21, 2730, 1500, -23),
     (1.13, -19.5, 2800, 900, -24.5), (1.24, -20, 3200, 1600, -23), (1.33, -17.5, 3450, 1800, -24.5),
     (1.43, -18, 3180, 1800, -22.5), (1.49, -23.5, 2700, 2200, -26), (1.56, -22, 2900, 2200, -22.5),
     (1.615, -22, 2700, 1200, -28), (1.65, -23.5, 2400, 1500, -26.5), (1.69, -24, 3300, 1500, -24.5)],
    [(2.89, -23.5, 2550, 1500, -21), (2.97, -27, 2380, 1100, -22.5), (3.11, -25, 2450, 1100, -21.5),
     (3.18, -24, 2320, 1000, -20), (3.29, -28, 2670, 1400, -21), (3.38, -25, 2560, 700, -23),
     (3.53, -22.5, 2500, 650, -24.5), (3.75, -22, 2460, 800, -22), (3.87, -25, 2750, 1710, -21),
     (4.19, -22, 3050, 1810, -23), (4.24, -23, 3500, 1100, -21), (4.39, -22, 2600, 1200, -24.5),
     (4.47, -27, 2750, 1500, -20.5), (4.53, -21.5, 3200, 1500, -22), (4.61, -22, 3200, 1400, -23.5),
     (4.69, -27, 1960, 600, -20.5), (4.8, -26.5, 2050, 600, -21.5), (4.95, -27, 1800, 500, -22.5),
     (5.0, -27, 1800, 600, -19.5), (5.04, -22.5, 2100, 1000, -22), (5.08, -23, 2000, 1200, -25)],
    [(6.02, -25, 2400, 1200, -21), (6.122, -24.5, 2930, 1500, -24.5), (6.25, -20.5, 2080, 900, -21.5),
     (6.328, -28.5, 3240, 1500, -20), (6.4, -23, 3260, 1500, -20)],
]
# The coasting shaft rubs as the blender is lifted: (start [s], end [s], added brush level before flutter [dB])
RUBBING = [(5.28, 5.43, -41)]
LOAD_FLUTTER_DB, LOAD_FLUTTERS_PER_S = 0.68, 15  # passing pieces make the clatter swell and sink


def blender():
    """Everything the motor drives follows the angle of its shaft; returns its tones and its clatter."""
    motion = speed, settled = drive()
    speed = np.maximum(speed, 1) * (1 + .003 * drift(45))  # pieces brake the blade unevenly
    turns = np.cumsum(speed) / SR
    angle = 2 * np.pi * turns
    rough = roughness(speed)
    knock_db = coupling_knock_db(speed)
    rattle_db, housing_hz, housing_width_hz, brush_db = by_burst(CLATTER)
    rattle_db = rattle_db + sum(db * spell(start, end) for start, end, _, db in CHEWING)

    rattle = rattling_housing(turns, speed, rough, knock_db, housing_hz, housing_width_hz)
    # the rattle shares its energy with the commutator's tone
    commutator = commutator_strength(speed, rough)
    level = loudness("rattle", rattle_db, *motion) / np.sqrt(1 + commutator ** 2)
    tones = unbalance(angle, speed) + mains_buzz() + blade_in_bell(turns, speed, rough, motion)
    tones += level * np.sqrt(2) * commutator * np.sin(BARS * angle)
    tones += ringing_overtones(angle)

    brush_level = loudness("brush", brush_db, *motion) + spells(RUBBING)
    brush = brush_level * brushes(turns, angle, speed, rough, settled, knock_db)
    clatter = level * rattle + scraping(rattle) + brush
    flutter = from_db(LOAD_FLUTTER_DB * drift(LOAD_FLUTTERS_PER_S))
    return tones, flutter * clatter + ticks(turns)


def scene():
    """The clatter fills the kitchen; the tones come straight from the bowl and the housing."""
    tones, clatter = blender()
    in_room = kitchen(clatter + bowl(), t60=0.36, wet_db=-8.5)
    return (in_room + tones + china() + background())[None]


# Microphone colour: (frequency [Hz], gain [dB])
MICROPHONE = [(20, -2), (10400, 1), (11100, -7.5), (11750, -27.5), (12400, -15), (16000, -22)]


def record(dry):
    """The microphone loses the high treble; a steep low-pass cuts the top."""
    sound = coloured(dry[0], MICROPHONE)
    low_pass = signal.ellip(12, .1, 90, CUTOFF_HZ, fs=SR, output="sos")
    return signal.sosfilt(low_pass, sound)[None]


dry = scene()
out = record(dry)
int16_out(out)
```